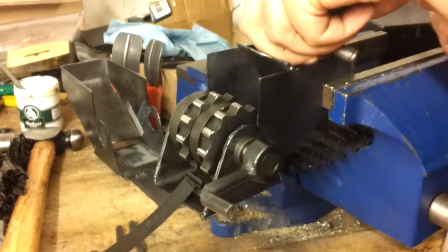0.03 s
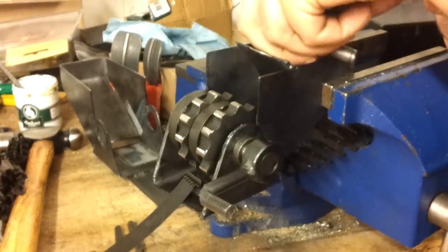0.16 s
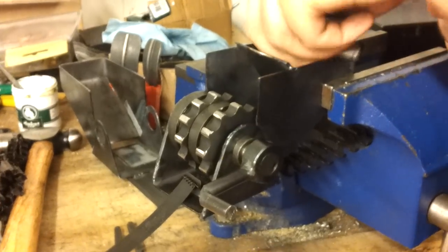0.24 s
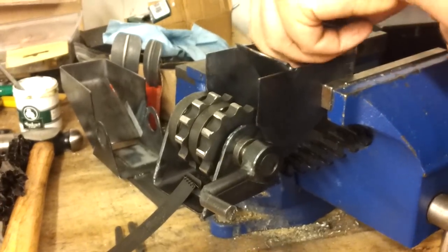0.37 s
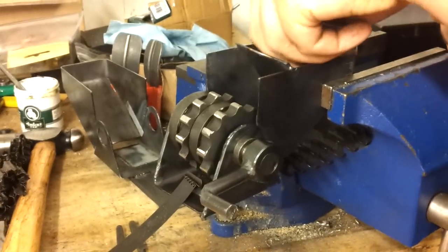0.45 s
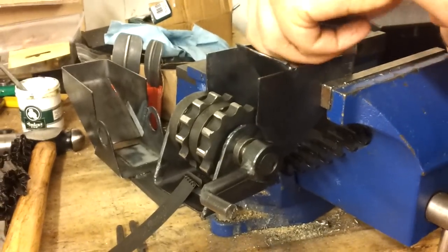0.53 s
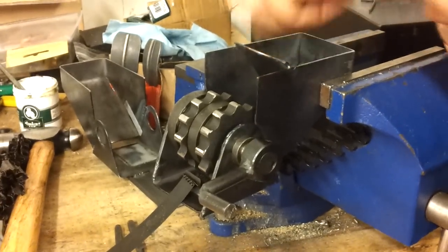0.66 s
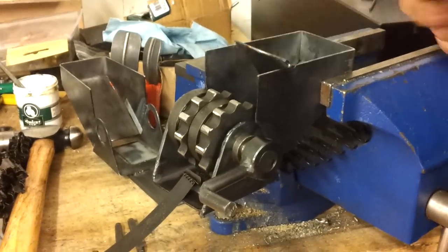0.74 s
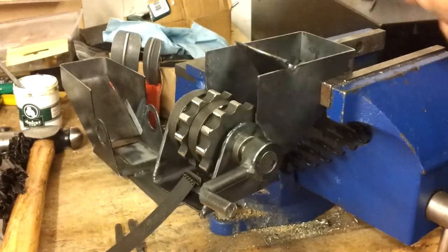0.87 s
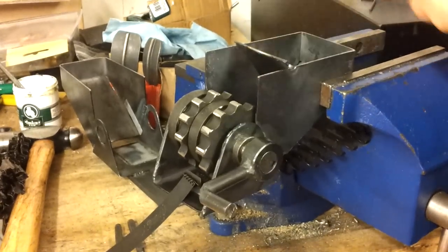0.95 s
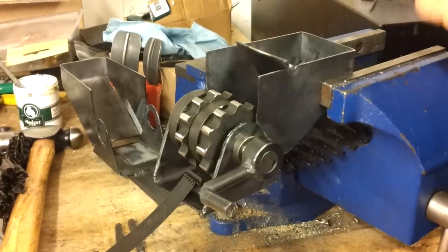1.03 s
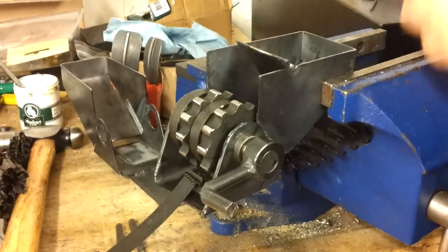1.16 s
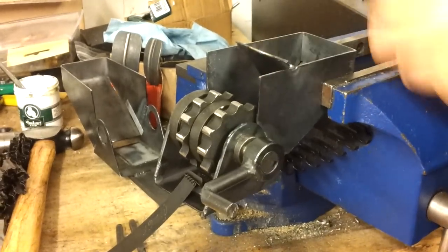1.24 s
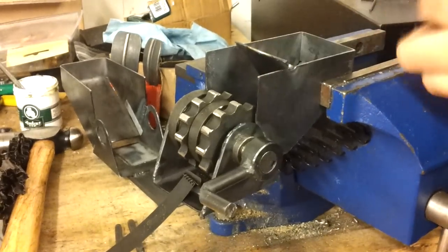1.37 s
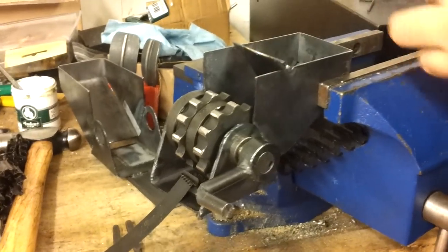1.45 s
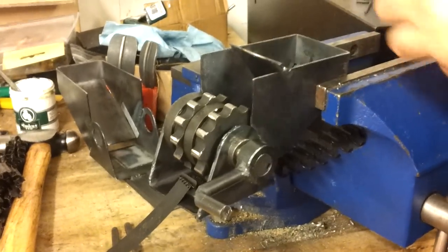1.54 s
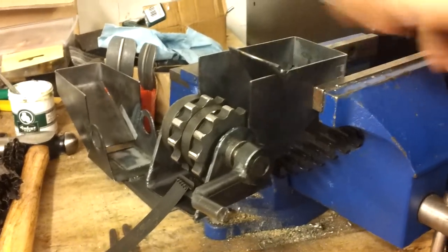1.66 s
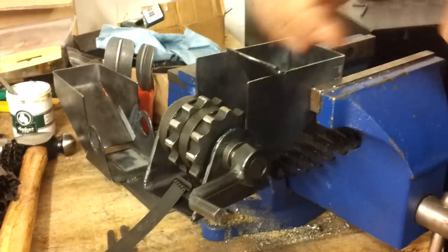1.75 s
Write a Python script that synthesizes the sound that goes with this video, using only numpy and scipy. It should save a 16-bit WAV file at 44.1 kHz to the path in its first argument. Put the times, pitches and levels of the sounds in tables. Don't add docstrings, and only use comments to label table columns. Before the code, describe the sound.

Metal cartridges dropped into a steel hopper, a short loud rattle, then quiet room hum and tiny taps.

```python
import sys
import numpy as np
from scipy import signal
from scipy.fft import rfft, irfft
from scipy.io import wavfile
from scipy.ndimage import uniform_filter1d

SR = 44100
rng = np.random.default_rng(int(sys.argv[2]) if len(sys.argv) > 2 else 0)


def gain_from_decibels(decibels):
    exponent = np.asarray(decibels, float) / 20
    return 10 ** exponent


def inscribe(sig):
    pcm = np.round(np.clip(np.atleast_2d(sig).T, -1, 1) * 32767)
    wavfile.write(sys.argv[1], SR, pcm.astype(np.int16))


N = 79380

# start in seconds, level in dB, upper wall modes in dB, free ringing in seconds.
WALL_KNOCKS = [(0.0143, -30.5, -5.5, 0.029), (0.0792, -26.5, 0.5, 0.026), (0.097, -33.5, 7.5, 0.0088),
               (0.118, -38.5, 6.5, 0.044), (0.1576, -9.5, -4, 0.0075), (0.1678, -1, -11.5, 0.023),
               (0.191, -12, -8, 0.02), (.216, -17, -3.5, 0.024), (0.234, -8.5, -30.5, 0.02),
               (0.257, -18, -24, 0.016), (.266, -16, -30, 0.019), (0.295, -11, -7.5, 0.0067),
               (.302, -17, -26.5, 0.032), (.312, -12.5, -8.5, 0.016), (0.322, -8.5, -3, 0.016),
               (0.394, -24.5, -13, 0.006), (0.407, -25, -26, 0.02), (0.4376, -18.5, 5, 0.018),
               (0.4505, -1, -9.5, 0.019), (0.476, -17, -7, 0.021), (0.496, -8.5, -24, 0.012),
               (0.5161, -4.5, -8.5, 0.0068), (0.5218, -8, -12.5, 0.012), (0.543, -8, -9.5, 0.014),
               (0.556, -19.5, 6, 0.003), (0.569, -13.5, -22.5, 0.015), (0.588, -8, -27, 0.016),
               (0.602, -19.5, -23.5, 0.006), (0.618, -15.5, -4, 0.0022), (0.6238, -16, 6, 0.008),
               (0.637, -15.5, -1, 0.013), (0.654, -23, 7, 0.018), (0.667, -23.5, -6.5, 0.0089),
               (.684, -21.5, -5, 0.012), (0.7, -20.5, -27, 0.011)]
# frequency in Hz, level in dB, T60 in seconds.
LOWER_WALL_MODES = [(1226, -17, .25), (1275, 0, .25), (1310, -14, .15), (1380, -8, .25), (1445, -14, .15),
                    (1491, -16, .15)]
# frequency in Hz, level in dB, T60 in seconds.
UPPER_WALL_MODES = [(1640, 0.5, .1), (1694, -1, 0.08), (1978, 6.5, 0.033), (2210, -4.5, 0.034),
                    (2475, -4, .1), (2580, 3, 0.062), (2720, -3.5, .05), (2980, 0, 0.21),
                    (3070, -6.5, 0.057), (3190, -11, .05), (3810, -9.5, .08), (4450, -2.5, 0.057)]
# frequency in Hz, level in dB, T60 in seconds.
CASE_MODES = [(4740, -5, .03), (5270, -6, .035), (5510, -3, .05), (6050, -7, .03), (6610, -2, .045),
              (6936, -3, .03), (7490, -3, .04), (8000, -6, .03), (8940, -9, .03), (9650, -11, .03),
              (10700, -9, .03), (11810, -14, .03), (12780, -10, .025), (13900, -18, .02)]


def evened(x):
    return x / np.sqrt(np.mean(x ** 2) + 1e-20)


def spectrum_at(points, hz):
    f, value = np.transpose(points)
    return np.interp(np.log(hz + 1), np.log(f + 1), value)


def coloured(x, points):
    gain = gain_from_decibels(spectrum_at(points, np.fft.rfftfreq(len(x), 1 / SR)))
    return evened(irfft(rfft(x) * gain, len(x)))


def passed(x, hz, kind, order):
    return signal.sosfilt(signal.butter(order, hz, kind, fs=SR, output="sos"), x)


def wander(size):
    return evened(uniform_filter1d(uniform_filter1d(rng.standard_normal(N), size), size))


def add(mix, s, sound):
    part = mix[round(s * SR):][:len(sound)]
    part += sound[:len(part)]


def ring(modes, lift_db=0., hold=1., touch_db=5.0, split=0.013, count=3):
    hz, db, t60 = np.transpose(modes)[:, :, None]
    t = np.arange(0, .25, 1 / SR)
    wave = np.zeros(len(t))
    for uneven, detune in rng.standard_normal((count, 2, len(modes), 1)):
        decay = gain_from_decibels(db + lift_db + touch_db * uneven - 60 * t / t60)
        wave += (decay * np.sin(2 * np.pi * hz * (1 + split * detune) * t)).sum(0)
    wave = wave * gain_from_decibels(-16 * np.clip((t - hold) / .003, 0, 1))
    if count > 1:
        bounces, when = np.zeros(2048), rng.random(4)
        places = (1 + np.minimum(when * 0.013 * SR, 2000)).astype(int)
        bounces[places] = gain_from_decibels(-4.5 * (1.0 + when)) * rng.choice([-1, 1], 4)
        bounces[0] = 1
        wave = signal.fftconvolve(wave, bounces)
    return wave / abs(wave).max()


def crack():
    # frequency in Hz, density in dB per Hz.
    snap_colour = [(180, -64), (300, -58.5), (1290, 0), (3390, -7.5), (7310, 1), (8330, -7.5), (13000, -9),
                   (15000, -31)]
    t = np.arange(2048) / SR
    snap = coloured(rng.standard_normal(2048), snap_colour) * gain_from_decibels(-60 * t / 0.04)
    return snap / abs(snap).max()


def workshop():
    # frequency in Hz, density in dB per Hz.
    air_colour = [(18, -42.5), (35, -22), (62, -4), (181, -11.5), (328, -10), (355, -6.5), (629, -14),
                  (13900, -28), (15000, -23)]
    # frequency in Hz, level in dB.
    hum_lines = [(60, -77.5), (120, -70.5), (180, -66), (301, -67.5), (360, -60.5), (481, -62.5)]
    t = np.arange(N) / SR
    background = gain_from_decibels(-54.5) * coloured(rng.standard_normal(N), air_colour)
    for hz, db in hum_lines:
        waver_db = 2.5 * wander(3000)
        background += gain_from_decibels(db + waver_db) * np.sin(2 * np.pi * (hz * t + rng.random()))
    creep_db = 2.5 * (t - 2.5)
    handling = gain_from_decibels(-46.5) * evened(passed(rng.standard_normal(N), [50, 464], "bandpass", order=2))
    fade = np.clip((0.15 - t) / 0.023, 0, 1)
    return background * gain_from_decibels(creep_db) + handling * fade


def rolling():
    # time in seconds, level in dB.
    heap_activity = [(0, -36), (.07, -49.5), (0.148, -45), (0.169, -23), (.28, -33), (.33, -45), (.42, -39),
                     (.46, -24), (.6, -33), (0.678, -32.5), (0.761, -55.5), (.88, -53.5), (1.001, -76.5)]
    contacts_per_s, spread_db = 690, 2
    size = gain_from_decibels(spread_db * np.minimum(rng.exponential(1, N), 4)) * (rng.random(N) < contacts_per_s / SR)
    size = size * gain_from_decibels(np.interp(np.arange(N) / SR, *np.transpose(heap_activity)))
    kind, out = rng.integers(0, 8, N), np.zeros(N)
    for k in range(8):
        touch = ring(CASE_MODES)
        touch += gain_from_decibels(-7.5) * ring(LOWER_WALL_MODES)
        touch += gain_from_decibels(2.5) * ring(UPPER_WALL_MODES)
        add(touch, 0, gain_from_decibels(-6) * crack())
        out += signal.oaconvolve(size * (kind == k), touch)[:N]
    return out * gain_from_decibels(-6)


def cases():
    # start in seconds, level in dB, favoured mode in Hz, snap in dB.
    case_clinks = [(0.0014, -39.5, 5200, -12.5), (0.0813, -33.5, 5520, -7), (0.0914, -43.5, 4150, 1),
                   (0.1155, -45, 4170, -8), (0.157, -5, 6930, 3), (0.1685, -11, 7500, -17),
                   (0.192, -14, 6630, -6.5), (0.216, -31.5, 6900, 0), (0.296, -12.5, 6870, -5),
                   (0.31, -12, 4710, -6), (0.3188, -6.5, 6935, -2.5), (0.3254, -13, 6675, 3),
                   (0.329, -24, 7040, 1.5), (0.369, -33.5, 6630, -3), (0.3923, -22, 6830, -6),
                   (0.437, -3.5, 5700, 1), (0.4506, -12, 5560, -13), (0.4757, -9.5, 7100, -5.5),
                   (0.495, -12, 5100, -9.5), (0.5179, -13, 7100, 0.5), (0.524, -8, 7060, -3),
                   (0.5452, -15, 5720, -3.5), (0.6254, -10.5, 7310, -2.5), (0.6385, -16, 7600, 3.5),
                   (0.6546, -9, 4820, -11), (0.6695, -20.5, 7270, 4), (0.852, -29.5, 5940, -2),
                   (0.8722, -23, 6090, -8), (0.8801, -27.5, 7240, -10)]
    favour_db, favour_oct, hold_s = 13.5, 0.084, 0.007
    modes_hz, out = np.array(CASE_MODES)[:, :1], np.zeros(N)
    for s, db, hz, snap_db in case_clinks:
        favour = favour_db * np.exp(-(np.log2(modes_hz / hz) / favour_oct) ** 2)
        add(out, s, gain_from_decibels(db) * ring(CASE_MODES, favour, hold=hold_s, split=0.012))
        add(out, s, gain_from_decibels(db + snap_db) * crack())
    return out


def room(x):
    # frequency in Hz, T60 in seconds.
    room_decay = [(1000, .45), (3000, .45), (7000, .4), (13000, .33)]
    delayed = rng.standard_normal(SR) * (np.arange(SR) > .007 * SR)
    hz, t, z = signal.stft(delayed, SR, nperseg=256)
    hz = hz[:, None]
    tail_db = 2.5 * (hz > 3000) - 60 * t / spectrum_at(room_decay, hz)
    tail = signal.istft(z * gain_from_decibels(tail_db), SR, nperseg=256)[1]
    return gain_from_decibels(-9) * signal.fftconvolve(x, tail / np.linalg.norm(tail))[:N]


def hopper():
    # time in seconds, level of its modes in dB.
    narrow_wall = [(0, 4.5), (.16, 8), (.17, -1), (.45, -2.5), (.5, 11), (.524, -2.5), (.545, 16.5),
                   (.7, 20.5)]
    out = np.zeros(N)
    is_narrow = np.array(LOWER_WALL_MODES)[:, :1] > LOWER_WALL_MODES[2][0]
    for s, db, upper_db, hold in WALL_KNOCKS:
        lift_db = np.interp(s, *np.transpose(narrow_wall)) * is_narrow
        lower = ring(LOWER_WALL_MODES, lift_db, hold=hold, touch_db=1, split=.002, count=1)
        if upper_db < -22:
            lower = lower * np.minimum(np.arange(len(lower)) / SR / .004, 1)
        upper = ring(UPPER_WALL_MODES, hold=hold, touch_db=5.5, split=0.0032, count=2)
        add(out, s, gain_from_decibels(db) * lower)
        add(out, s, gain_from_decibels(db + upper_db) * upper)
    return out


def bench():
    # frequency in Hz, level in dB, T60 in seconds.
    bench_modes = [(384, -1.2, 0.094), (696.5, 0.5, 0.12), (1027, -1.5, 0.076)]
    out = np.zeros(N)
    for s, db, _, _ in WALL_KNOCKS:
        add(out, s, gain_from_decibels(db - 33.5) * ring(bench_modes, touch_db=-1.5, split=0.0067, count=1))
    return out


def thud():
    # start in seconds, level in dB, T60 in seconds.
    first_landing = (.157, -37, 0.15)
    s, db, t60 = first_landing
    out, t = np.zeros(N), np.arange(4000) / SR
    burst = evened(passed(rng.standard_normal(4000), 820, "lowpass", order=2))
    add(out, s, gain_from_decibels(db - 60 * t / t60) * burst)
    return out


def singers():
    # start in seconds, level in dB, frequency in Hz, T60 in seconds.
    free_parts = [(.158, -20.5, 6610, .12), (.158, -22, 10700, .08), (.1685, -21, 3040, .2),
                  (.192, -19.5, 6610, .12), (.21, -51.5, 80, .4), (.3194, -14, 6610, 0.19),
                  (.3194, -20, 3810, .06), (.335, -40.5, 330, .3), (.392, -27.5, 7510, .06),
                  (.4372, -19, 5500, .4), (.4372, -15, 10700, .1), (.4505, -18.5, 3040, .25),
                  (.475, -47.5, 700, .2), (.4955, -21, 7490, .04), (.524, -23.5, 5510, 0.25),
                  (.524, -15.5, 10700, 0.045), (.54, -52.5, 700, .15), (.56, -56.5, 130, .2),
                  (.6252, -14, 2540, .03), (.6252, -26, 7490, .15), (.635, -42.5, 700, .3),
                  (.654, -16.5, 3810, .07), (.655, -42.5, 360, .3), (.66, -24, 2030, .06),
                  (.67, -24.5, 7490, .05), (.8722, -37.5, 6050, .1)]
    out = np.zeros(N)
    for s, db, hz, t60 in free_parts:
        pair = [(hz, 0, t60), (hz * 1.008, -1, t60)]
        add(out, s, gain_from_decibels(db) * ring(pair, touch_db=1, split=.001, count=1))
    rattle_db = 5 * wander(120)
    return out * gain_from_decibels(-6 + rattle_db)


def pings():
    # start in seconds, level in dB.
    tip_pings = [
        (.4775, -23.5),
        (.6255, -13),
        (.853, -21),
    ]
    # frequency in Hz, level in dB, T60 in seconds.
    tip_modes = [(11700, -3, .05), (11810, 0, .06), (11920, -6, .04)]
    out = np.zeros(N)
    for s, db in tip_pings:
        add(out, s, gain_from_decibels(db) * ring(tip_modes, touch_db=0, split=0, count=1))
    return out


def taps():
    # start in seconds, level in dB, lowest mode in dB.
    late_taps = [
        (1.5953, -44, -20),
        (1.6003, -48, -20),
        (1.6097, -31, 4),
        (1.6125, -40, -8),
        (1.6163, -43, -20),
        (1.6177, -41, -10),
    ]
    # frequency in Hz, level in dB, T60 in seconds.
    tap_modes = [(2000, 0, .014), (3400, -2, .014), (5600, -4, .012), (6600, -2, .014), (7400, -3, .01),
                 (8400, -4, .006)]
    out, lowest = np.zeros(N), (np.arange(6) == 0)[:, None]
    for s, db, lowest_db in late_taps:
        add(out, s, gain_from_decibels(db) * ring(tap_modes, lowest_db * lowest, touch_db=2, split=.03, count=1))
    return out


def scene():
    struck = hopper() + cases() + rolling() + taps()
    metal = passed(struck, 1120, "highpass", order=8) + singers()
    tips = pings()
    mid = metal + tips + room(metal + gain_from_decibels(-5) * tips) + workshop() + bench() + thud()
    side = gain_from_decibels(-19) * passed(metal, 2000, "highpass", order=2) * wander(300)
    return np.array([mid + side, mid - side])


def gated_top(x):
    # lower edge in Hz, threshold in dB relative to the whole sound.
    top_bands = [(13300, -24), (12200, -30)]
    for hz, under_db in top_bands:
        treble = signal.oaconvolve(x, signal.firwin(301, hz, pass_zero=False, fs=SR)[None], "same")
        power = uniform_filter1d(np.array([treble[0], x[0] * gain_from_decibels(under_db)]) ** 2, size=1024, axis=1)
        x = x - treble * uniform_filter1d(1. * (power[0] < power[1]), size=256)
    return x


def band_limit(x):
    return signal.sosfilt(signal.butter(12, 15170, fs=SR, output="sos"), x)


def record(dry):
    # start and end in seconds, low and high edge in Hz.
    band_gaps = [
        (.172, .205, 1, 620),
        (.205, .27, 150, 560),
        (.44, .555, 1, 640),
        (.555, .64, 1, 90),
        (.64, .705, 1, 230),
        (.65, .848, 12400, 22000),
        (.635, .66, 13400, 22000),
    ]
    t, hz = np.arange(N) / SR, np.fft.rfftfreq(N, 1 / SR)
    gated = 1.563 * np.tanh(dry / 1.363)
    for start, end, low_hz, high_hz in band_gaps:
        band = irfft(rfft(gated) * ((hz > low_hz) & (hz < high_hz)), N)
        gated = gated - band * uniform_filter1d(1. * ((t > start) & (t < end)), size=400)
    edge = signal.firwin(301, 14700, window=("kaiser", 8), fs=SR)[None]
    return band_limit(signal.oaconvolve(gated_top(gated), edge, "same"))


dry = scene()
out = record(dry)
inscribe(out)
```